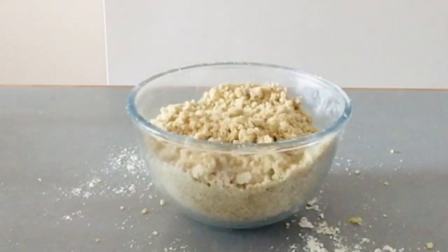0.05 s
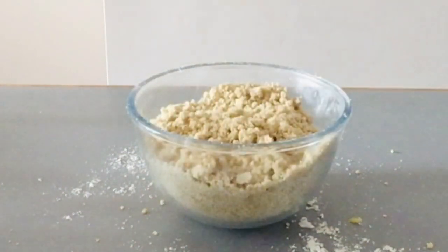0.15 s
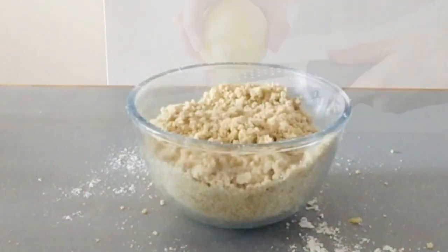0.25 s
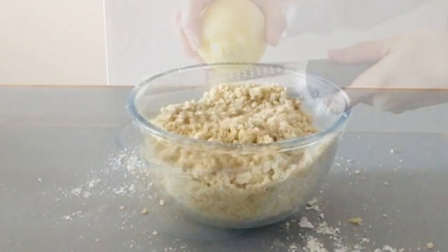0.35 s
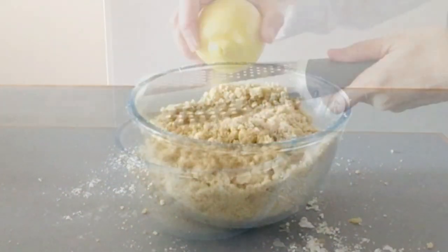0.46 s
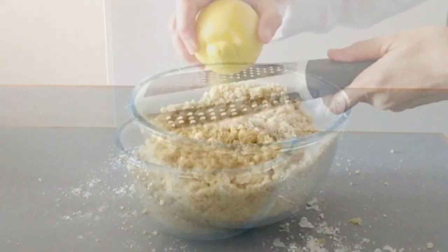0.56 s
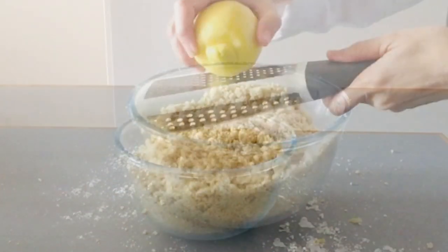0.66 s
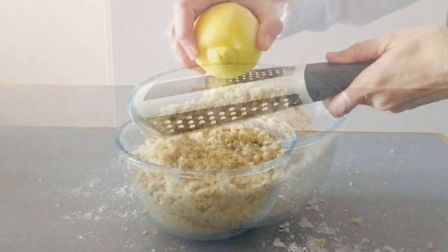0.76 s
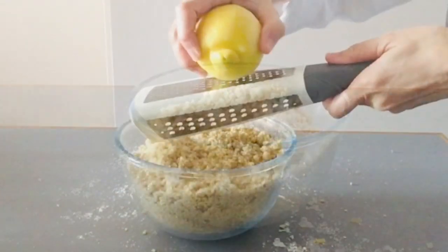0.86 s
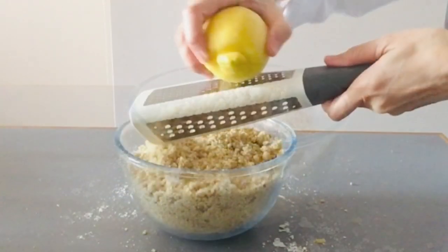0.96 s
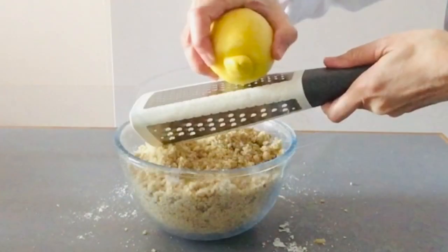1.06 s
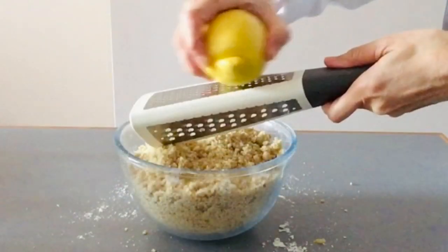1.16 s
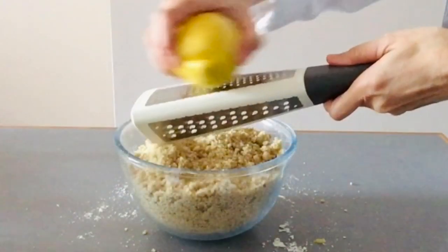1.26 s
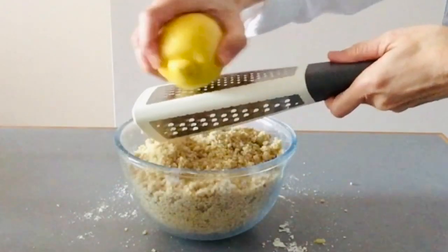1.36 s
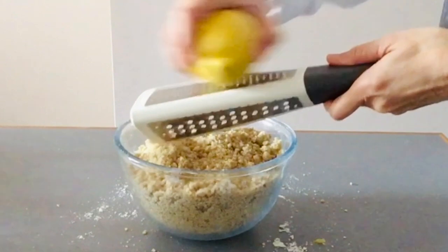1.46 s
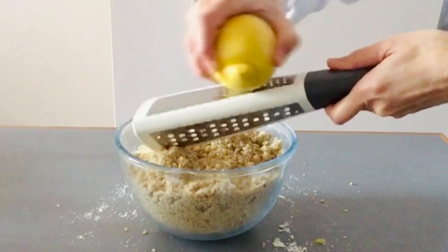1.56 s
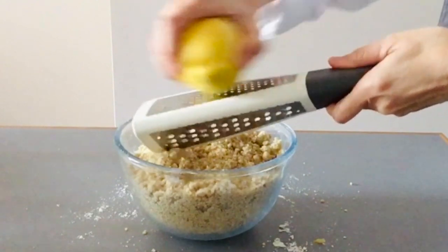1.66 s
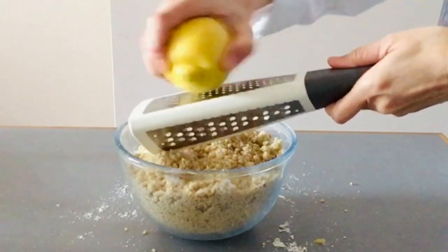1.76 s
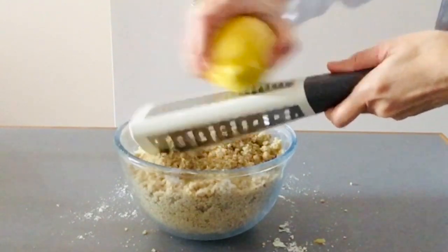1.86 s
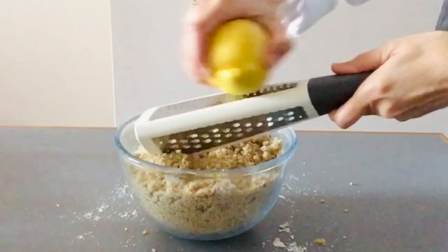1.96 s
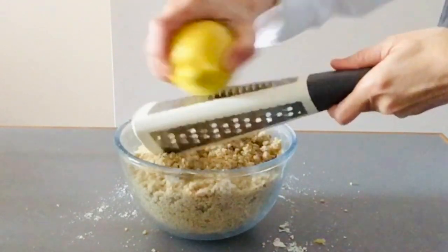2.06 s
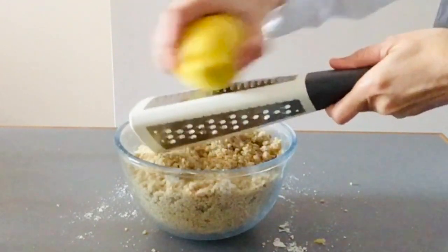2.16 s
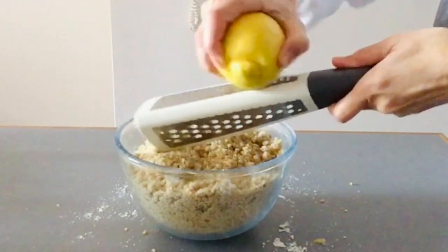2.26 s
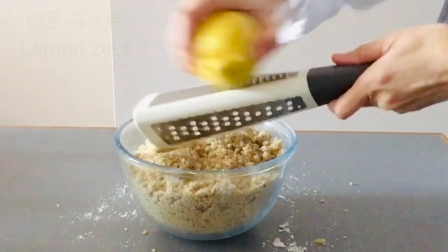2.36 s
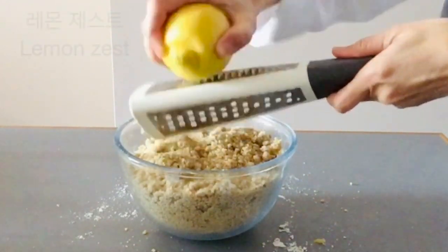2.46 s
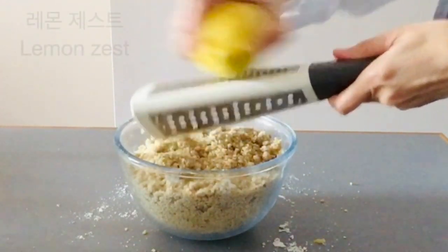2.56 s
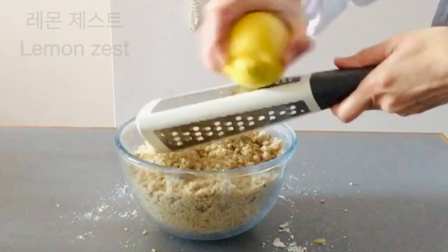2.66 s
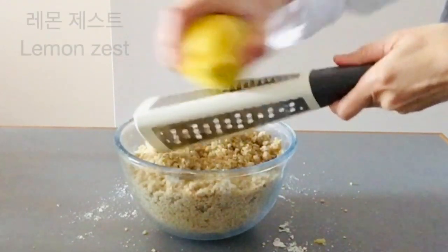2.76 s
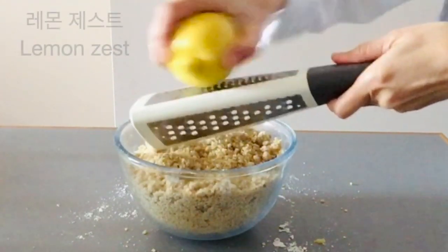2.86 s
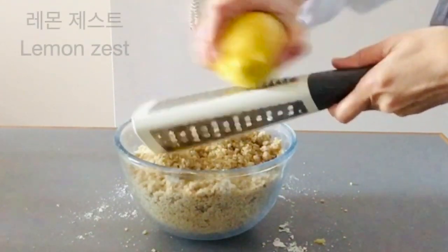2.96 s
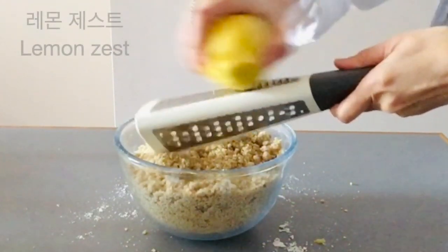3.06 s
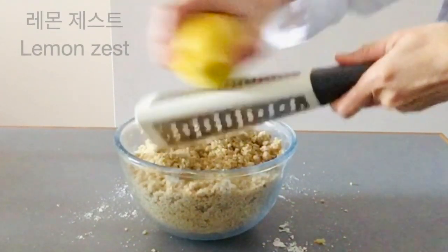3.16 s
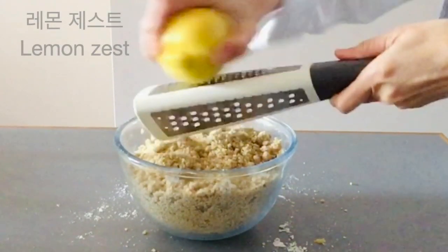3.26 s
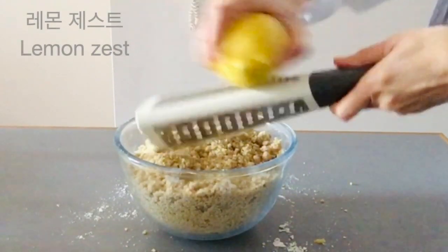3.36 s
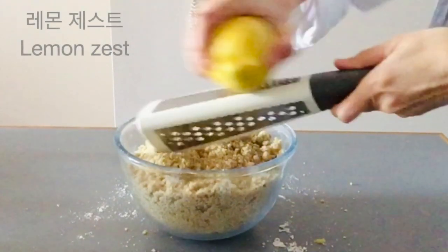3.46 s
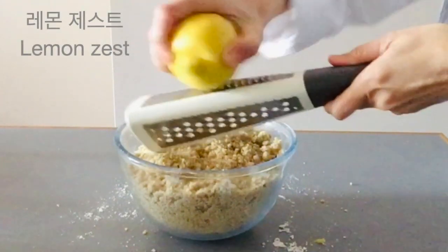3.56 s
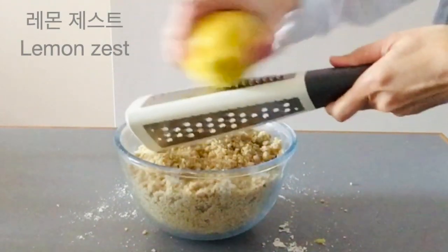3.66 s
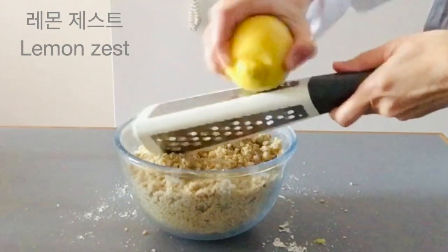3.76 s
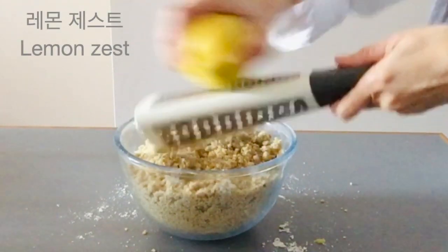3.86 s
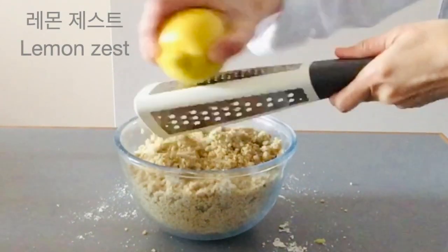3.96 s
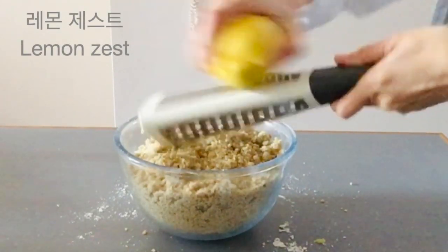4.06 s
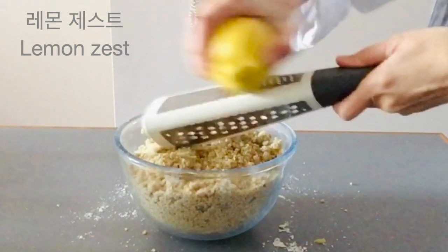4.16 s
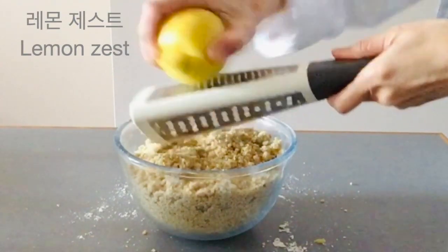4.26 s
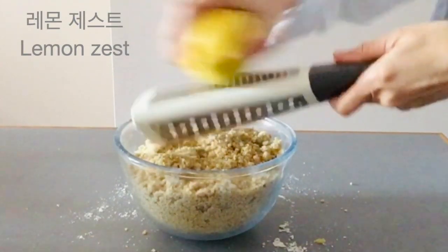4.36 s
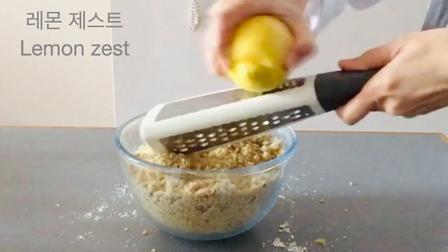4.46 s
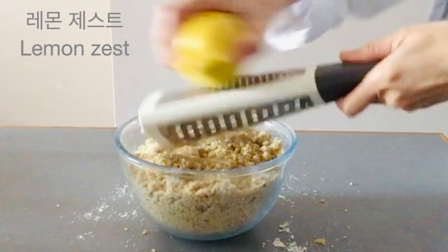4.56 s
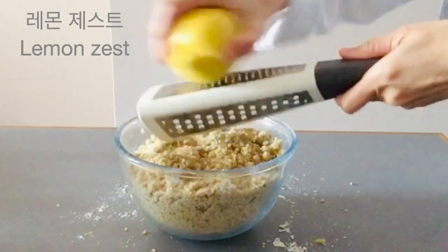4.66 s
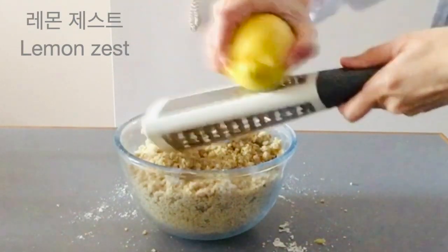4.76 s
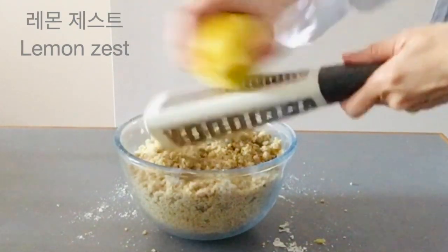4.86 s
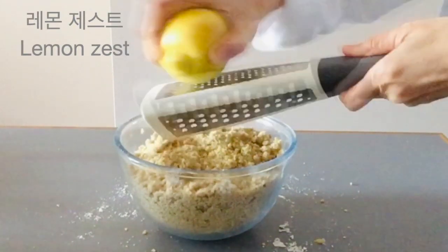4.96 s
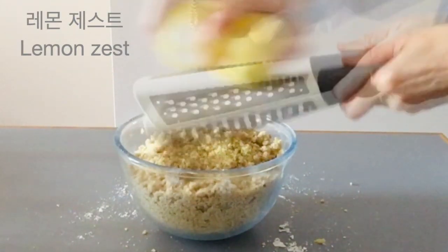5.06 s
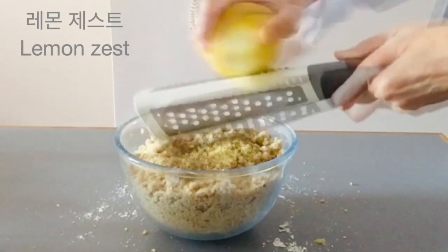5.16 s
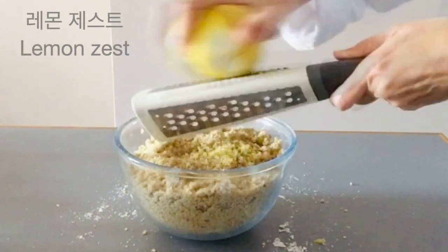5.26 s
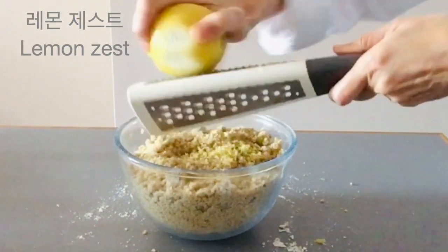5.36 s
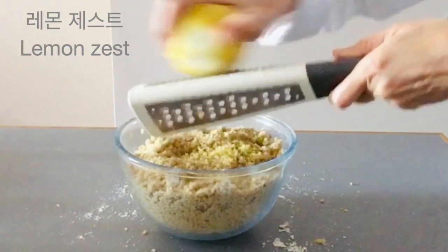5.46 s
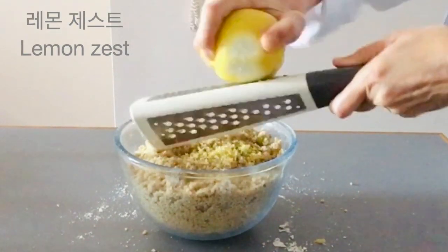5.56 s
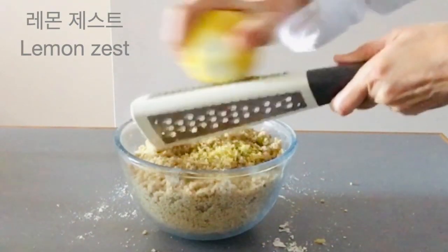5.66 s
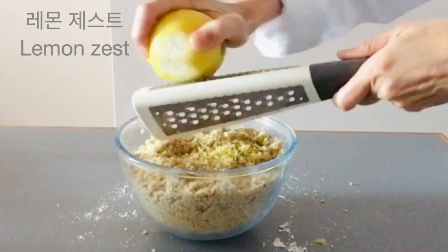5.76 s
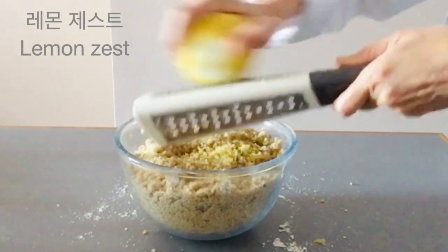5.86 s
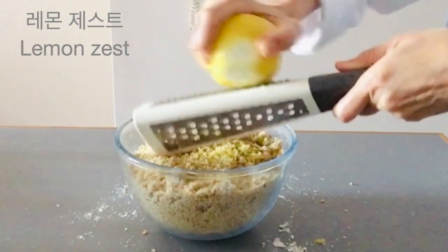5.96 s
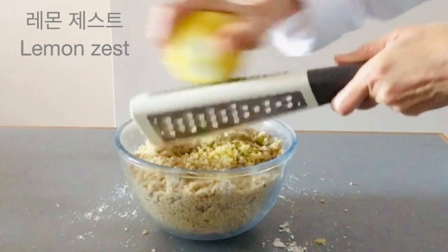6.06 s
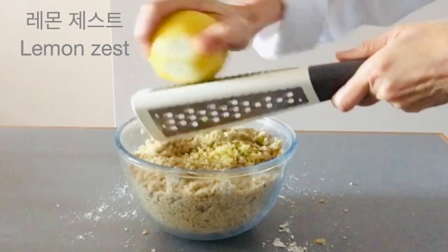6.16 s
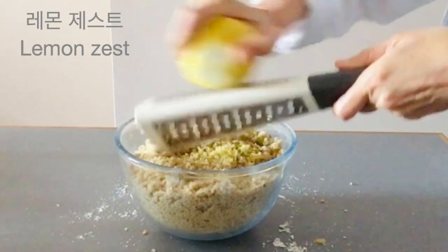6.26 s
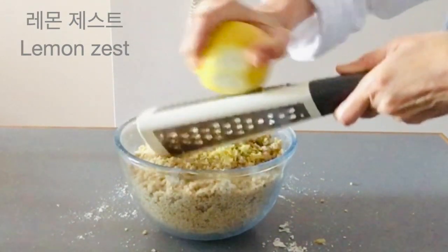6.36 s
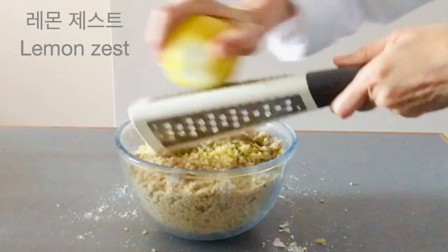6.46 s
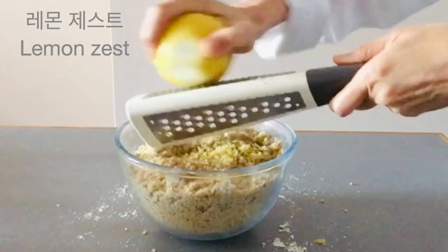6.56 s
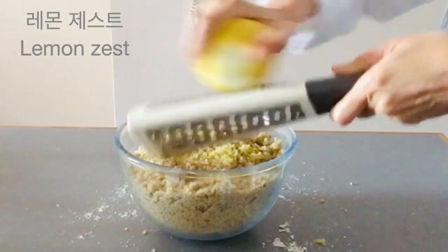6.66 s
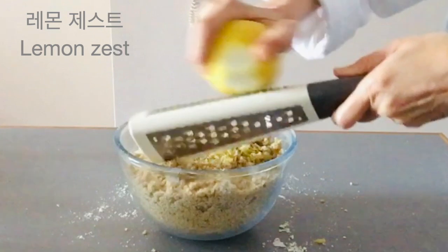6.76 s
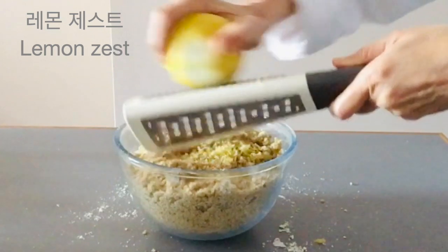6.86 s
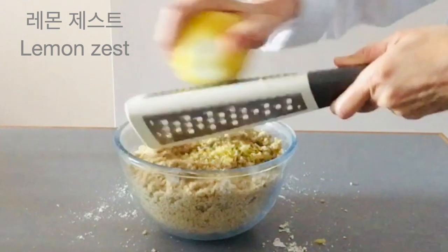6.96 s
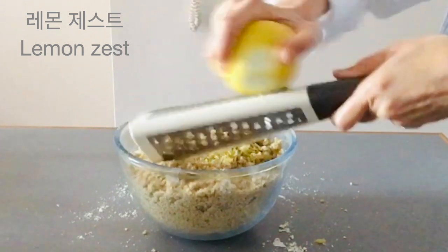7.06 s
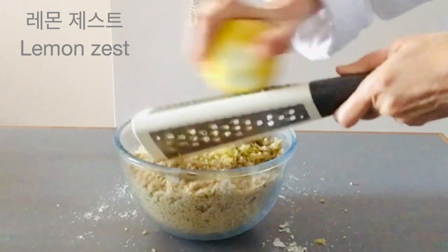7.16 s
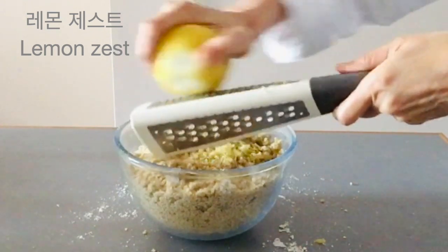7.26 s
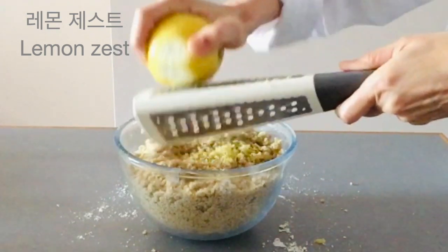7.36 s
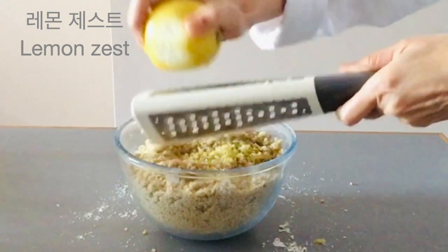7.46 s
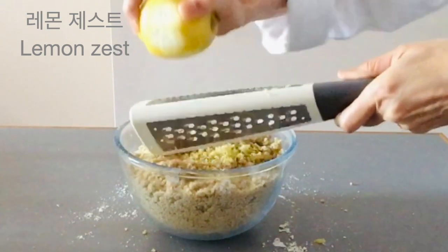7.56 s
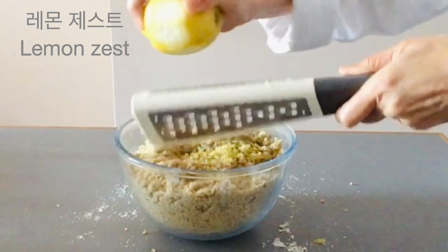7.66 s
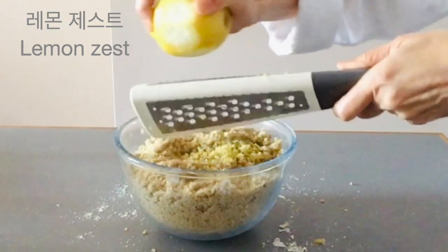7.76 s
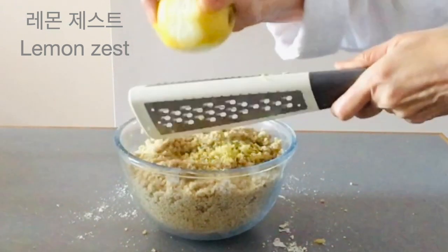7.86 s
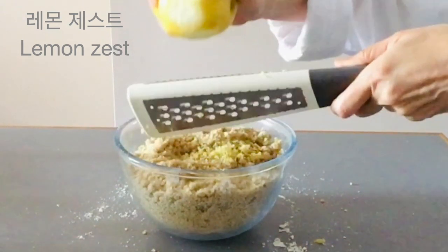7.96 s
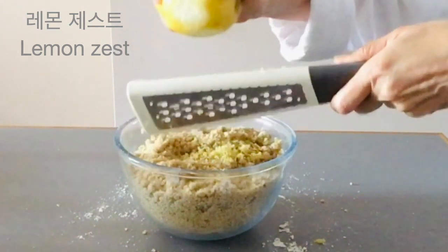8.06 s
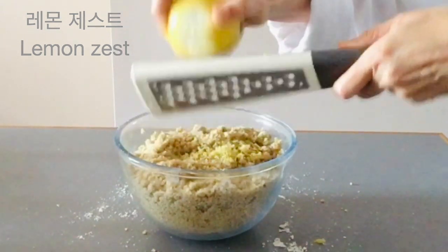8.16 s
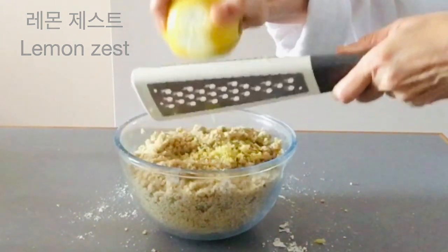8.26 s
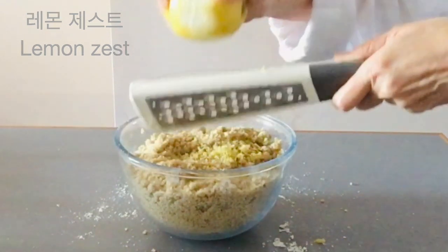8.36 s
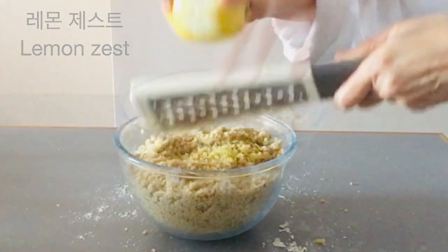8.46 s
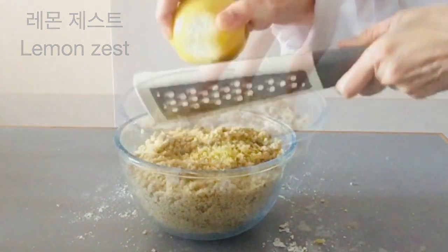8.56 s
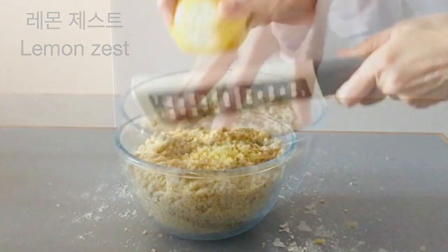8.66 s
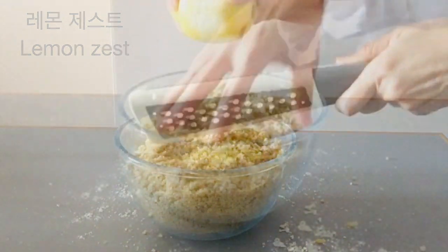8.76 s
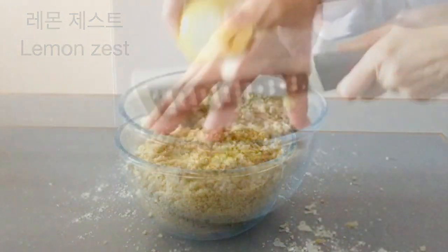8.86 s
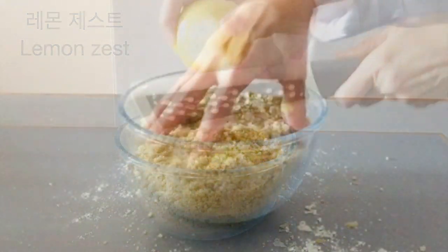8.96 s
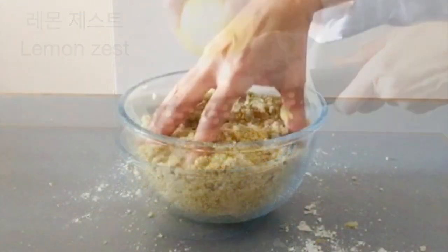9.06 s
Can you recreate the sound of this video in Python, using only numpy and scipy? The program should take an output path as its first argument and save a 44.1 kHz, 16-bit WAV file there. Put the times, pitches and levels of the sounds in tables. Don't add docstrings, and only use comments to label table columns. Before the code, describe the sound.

Faint hiss gives way to a lemon being zested close to the microphone. Dry, grainy strokes swing steadily back and forth, the thin metal blade ringing with a papery, bright rasp and occasional snapping catches. After the last stroke, three spaced dull taps sound on the plastic handle, each softer, in a small room with light echo, hum and rumble.

```python
import sys
import numpy as np
from scipy import signal
from scipy.fft import rfft, irfft, next_fast_len
from scipy.io import wavfile

SR = 44100
rng = np.random.default_rng(int(sys.argv[2]) if len(sys.argv) > 2 else 0)


def generate_wav(signal):
    frames = np.transpose(np.atleast_2d(signal))
    scaled = np.clip(frames, -1, 1) * 32767
    pcm = np.round(scaled).astype(np.int16)
    wavfile.write(sys.argv[1], SR, pcm)


def amplitude_ratio(level_db):
    exponent = np.asarray(level_db, float) / 20
    return 10 ** exponent


N = 402633
TIME = np.arange(N) / SR
SHOT_CHANGE_S = 5.07


def rms_one(x):
    return x / np.sqrt(np.mean(x ** 2) + 1e-20)


def in_time(rows):
    s, *columns = np.transpose(rows)
    return [np.interp(TIME, s, c) for c in columns]


def colour(x, points):
    size = next_fast_len(N + SR)
    hz, db = np.transpose(points)
    bins_hz = np.arange(size // 2 + 1) * SR / size
    gain_db = np.interp(np.log(bins_hz + 1), np.log(hz), db)
    cepstrum = irfft(np.log(amplitude_ratio(gain_db)), size)
    cepstrum[1:size // 2] *= 2
    cepstrum[size // 2 + 1:] = 0
    return irfft(rfft(x, size) * np.exp(rfft(cepstrum)), size)[:N]


def drift(rate):
    r = np.exp(-40 * np.pi * rate / SR)
    slow = signal.lfilter([1], [1, -2 * r, r * r], rng.standard_normal(N // 20 + 502))[500:]
    return np.interp(np.arange(N) / 20, np.arange(len(slow)), rms_one(slow))


def resonance(x, hz, width_hz):
    r = np.exp(-np.pi * width_hz / SR)
    top = (1 - r * r) / 2
    return signal.lfilter([top, 0, -top], [1, -2 * r * np.cos(2 * np.pi * hz / SR), r * r], x)


def ring(clicks, modes, spread_db):
    out, hits = 0, np.flatnonzero(clicks)
    for hz, db, t60 in modes:
        r, w = amplitude_ratio(-60 / (t60 * SR)), 2 * np.pi * hz / SR
        struck = clicks + 1e-18
        struck[hits] *= amplitude_ratio(spread_db * rng.standard_normal(len(hits)))
        out = out + signal.lfilter([0, amplitude_ratio(db) * np.sin(w)], [1, -2 * r * np.cos(w), r * r], struck)
    return out


def clicks_at(seconds, db):
    out = np.zeros(N)
    out[np.round(np.asarray(seconds) * SR).astype(int)] = amplitude_ratio(np.asarray(db))
    return out


def low_pass(x, hz):
    size = next_fast_len(N)
    spectrum = rfft(x, size)
    spectrum[int(hz / SR * size):] = 0
    return irfft(spectrum, size)[:N]


def high_pass(x, hz):
    return signal.sosfilt(signal.butter(2, hz, "high", fs=SR, output="sos"), x)


# (time [s], level [dB])
EARLIER_HISS = [
    (0, -73.5),
    (.3, -73.5),
    (.55, -77),
    (.75, -84),
    (.9, -98),
]


def earlier_scene():
    level = amplitude_ratio(in_time(EARLIER_HISS)[0]) * (TIME < EARLIER_HISS[-1][0])
    return low_pass(level * rng.standard_normal(N), 15750)


# (time [s], level [dB])
SCENE_FADE = [
    (0, -20),
    (.5, -13),
    (1, -0.4),
    (3, 0.5),
    (4.5, 4),
    (6, 0.5),
    (8.2, -1),
    (8.7, -3),
    (9.13, -14.5),
]
# (frequency [Hz], level [dB per Hz])
HISS_COLOUR = [(200, 0.5), (400, -2), (660, 1), (1000, -2), (3000, -2.5), (6400, -4.5), (9000, -6.5),
               (12500, -9)]
# (frequency [Hz], level [dB per Hz])
RUMBLE_COLOUR = [(12, -17), (22, -10), (38, -7), (50, 5.5), (60, 0), (74, -1.5), (95, -4.5), (170, -4),
                 (300, -12), (500, -26)]
HUM_HZ = (13.7, 32.5)
# (time [s], level [dB])
COUNTER_SHAKE = [(.7, -81), (.96, -60), (1.25, -63), (1.45, -57), (2, -46), (2.34, -43), (2.6, -53),
                 (3.66, -48.5), (3.84, -44), (5.421, -46.5), (5.6, -51.5), (6.66, -48.5), (6.809, -42),
                 (6.94, -63.5), (7.14, -38), (7.53, -53), (8.95, -60.5), (9.13, -61)]
HISS_DB, RUMBLE_DB, UPPER_HUM_DB = -59.5, -64.5, -62
RUMBLE_FOLLOWS = 0.7


def background():
    fade_db, = in_time(SCENE_FADE)
    hiss = amplitude_ratio(HISS_DB + fade_db) * rms_one(colour(rng.standard_normal(N), HISS_COLOUR))
    rumble_db = RUMBLE_DB + RUMBLE_FOLLOWS * np.minimum(fade_db, 0) + 0.97 * drift(1.7)
    rumble = amplitude_ratio(rumble_db) * rms_one(colour(rng.standard_normal(N), RUMBLE_COLOUR))
    hum = 0
    for hz, db in zip(HUM_HZ, (in_time(COUNTER_SHAKE)[0], UPPER_HUM_DB + fade_db)):
        pitch_hz = hz * (1 + 0.0692 * drift(4.08))
        level = amplitude_ratio(db + 1.7 + 3.75 * drift(4.8))
        hum = hum + level * np.sin(2 * np.pi * np.cumsum(pitch_hz) / SR)
    return hiss + rumble + hum


# (touch [s], rise [s], touch to lift [s], first bite [dB], swell while cutting [dB])
CUTTING_STROKES = [(1.101, 0.1, 0.18, -59, 5), (1.566, 0.039, 0.11, -52.5, 5),
                   (1.942, 0.022, 0.11, -49.5, 8.5), (2.312, 0.043, 0.11, -43.5, 5),
                   (2.696, 0.031, 0.11, -37, -2.5), (3.059, .018, 0.1, -37, 0.4),
                   (3.405, 0.068, 0.12, -36.5, -1.5), (3.774, 0.024, 0.11, -37, 1.5),
                   (4.135, 0.042, 0.11, -37.5, 1), (4.477, 0.027, 0.091, -32.5, 0.5),
                   (4.816, .045, 0.096, -31, -2.5), (5.212, .102, 0.15, -35.5, -2.1),
                   (5.62, 0.025, 0.11, -40.5, 6), (5.986, 0.065, 0.13, -36, -1),
                   (6.379, .031, 0.11, -40, 3.2), (6.74, .03, 0.1, -44, 13),
                   (7.116, 0.039, 0.14, -34.5, 2.5)]
# (full contact [s], hold [s], level [dB])
RETURN_STROKES = [(1.433, 0.051, -58), (1.8, 0.06, -56.5), (2.19, 0.044, -53), (2.567, 0.033, -49),
                  (2.926, 0.038, -49), (3.275, 0.049, -47), (3.662, 0.03, -47.6), (4.004, 0.042, -45.5),
                  (4.36, 0.025, -42.5), (4.715, 0.015, -42), (5.03, 0.043, -44.5), (5.14, .083, -45.5),
                  (5.485, 0.059, -42), (5.86, 0.051, -43), (6.246, 0.059, -48), (6.63, 0.051, -43),
                  (6.989, 0.065, -43.5), (7.36, 0.04, -53.5)]
CUT_FALL_S = 0.0745
RETURN_RISE_S, RETURN_FALL_S = 0.076, 0.085
PITH_FALL_S = 0.066
GRAB_SHARE, GRAB_DB = 0.48, -8


def pressure():
    strokes = []
    for touch, rise, length, db, swell_db in CUTTING_STROKES:
        strokes.append((touch, rise, length - rise, CUT_FALL_S, db, db + swell_db))
    for s, hold, db in RETURN_STROKES:
        fall = RETURN_FALL_S if s < SHOT_CHANGE_S else PITH_FALL_S
        strokes.append((s - RETURN_RISE_S, RETURN_RISE_S, hold, fall, db, db))
    power = np.zeros(N)
    for touch, rise, hold, fall, first_db, last_db in strokes:
        steps = [0, GRAB_SHARE * rise, (1 - GRAB_SHARE) * rise, hold, fall, 2 * fall]
        corners = touch + np.cumsum(steps)
        db = [first_db - 20, first_db + GRAB_DB, first_db, last_db, last_db - 20, last_db - 60]
        a, b = int(corners[0] * SR), int(corners[-1] * SR)
        power[a:b] += amplitude_ratio(2 * np.interp(TIME[a:b], corners, db))
    return np.sqrt(power)


def tearing(force):
    sizes = amplitude_ratio(3.1 * np.minimum(rng.exponential(1, N), 3.5)) * rng.choice([-1, 1], N)
    grains_per_s = 4000 * amplitude_ratio(2.2 * drift(50))
    grains = rms_one(sizes * (rng.random(N) < grains_per_s / SR))
    bite = np.clip(force / amplitude_ratio(-35.0), 0, 1) ** 0.25
    friction = rng.standard_normal(N) * (1 - 0.3 * bite)
    return amplitude_ratio(0.87 * drift(91)) * (friction + 0.58 * bite * grains)


# (frequency [Hz], width [Hz], level [dB])
GRATER_MODES = [(85.5, 35, -9.5), (160, 38, -8.5), (262.5, 44.3, -1.5), (334, 68, -6.5), (428, 160, -9.5),
                (1007, 26.7, -1), (1097, 30, -2.5), (1508, 120, 0), (1578, 69, 4.5), (1710, 177, 1.5),
                (2160, 95, -4), (2324, 120, -5), (2950, 170, -4), (3037, 106, -2.5), (3505, 117, -6),
                (3945, 110, -7.5), (4840, 155, -7.5), (5690, 145, -4.5), (6150, 300, -8.5),
                (8130, 890, -14), (9400, 140, -18)]
# (frequency [Hz], level [dB per Hz])
PEEL_COLOUR = [(40, -39), (120, -33.5), (400, -17), (900, -11.5), (1300, -6.5), (2600, -6.5), (4400, -5.5),
               (5300, -9), (6300, -10), (7000, -17), (8800, -16), (12500, -24.5)]
# (time [s], place [-1 tip to 1 handle])
FRUIT_PLACE = [
    (1, -1.9),
    (1.8, -.6),
    (2.6, -0.065),
    (4, -0.55),
    (4.6, -0.63),
    (4.95, -0.69),
    (5.25, 0.071),
    (5.9, 0.65),
    (7, 0.048),
    (7.6, 0.84),
]
# (level at mid blade [dB], gain toward the handle [dB])
HANDLE_DB, PEEL_DB, NECK_DB, LOW_BLADE_DB = (-1.9, -3), (2.07, 0.9), (-1.5, 7), (0.7, -3.5)
UPPER_BLADE_DB = 1


def grater(force):
    grains = tearing(force)
    place, = in_time(FRUIT_PLACE)
    settings = (HANDLE_DB, PEEL_DB, NECK_DB, LOW_BLADE_DB)
    handle_db, hiss_db, neck_db, blade_db = (db + slope * place for db, slope in settings)
    out = amplitude_ratio(7.5 + hiss_db) * colour(force * grains * rng.choice([-1, 1], N), PEEL_COLOUR)
    wander = [drift(21) + 0.65 * drift(5.7) for k in range(9)]
    shake = amplitude_ratio(-7.5) * force ** 0.77
    for k, (hz, width_hz, mode_db) in enumerate(GRATER_MODES):
        if hz < 350:
            place_db = handle_db
        elif hz < 600:
            place_db = neck_db
        else:
            place_db = blade_db * (hz < 1200) + UPPER_BLADE_DB * place * (2000 < hz < 2600)
        drive = shake if hz < 600 else force
        fed = drive * grains * amplitude_ratio(2.7 * wander[k % 9] + place_db)
        out += (-1) ** k * amplitude_ratio(mode_db + 11.0) * resonance(fed, hz, width_hz)
    return out


KITCHEN_T60_S, KITCHEN_DB, WALL_CUT_HZ = 0.8, -12.5, 5700


def kitchen(x):
    t = np.arange(int(.7 * SR)) / SR
    size, out = next_fast_len(N + SR), 0
    place = (TIME * 5.3) % 4
    for k in range(4):
        white = rng.standard_normal(len(t)) * (t > .006)
        dull = signal.sosfilt(signal.butter(1, WALL_CUT_HZ, fs=SR, output="sos"), white)
        tail = dull * amplitude_ratio(-60 * t / KITCHEN_T60_S) + (white - dull) * amplitude_ratio(-100 * t / KITCHEN_T60_S)
        share = np.clip(1 - np.abs((place - k + 2) % 4 - 2), 0, 1)
        out = out + rfft(x * share, size) * rfft(tail / np.sqrt(np.sum(tail ** 2)), size)
    return irfft(out, size)[:N]


# (time [s], peak level [dB], brightness [dB])
CATCHES = [(1.9708, -39, -6), (2.4159, -30, -5), (2.7555, -31, -6), (3.0798, -23, 4), (3.1654, -28, -3),
           (3.441, -34, 1), (3.4611, -29, -7), (3.4879, -26, 7), (3.7913, -31, -1), (3.83, -26, 0),
           (4.1722, -27, -11), (4.2399, -27, -8), (4.4892, -25, 1), (4.5344, -16.5, 8), (4.542, -21, 10),
           (4.5648, -24, -1), (4.5908, -24, -6), (4.8613, -23, 6), (4.8843, -24, -3), (5.1832, -32, -4),
           (5.2155, -29, 8), (5.2623, -32, 6), (5.7, -24, -4), (5.8848, -31, 9), (6.0524, -28, 7),
           (6.7885, -26, 1), (6.8316, -15, 9), (7.1579, -22, 3), (7.1959, -21, 8), (7.2524, -24, -3)]
# (frequency [Hz], level [dB], time to die by 60 dB [s])
TOOTH_MODES = [(3000, -3.5, .01), (4100, -6, .007), (5700, -7, .006), (8300, -13, .003)]
# (frequency [Hz], level [dB], time to die by 60 dB [s])
SNAGGED_BLADE_MODES = [(1050, -11, .02), (1560, -3, .014), (1800, -6, .012)]
NICKS_PER_S, NICK_FORCE_DB, NICK_OVER_DB, NICK_SPREAD_DB = 60, -36, 3, 3


def snags(force):
    nicks_per_s = NICKS_PER_S * np.minimum(force / amplitude_ratio(NICK_FORCE_DB), 1)
    nicks = np.flatnonzero(rng.random(N) < nicks_per_s / SR)
    luck = rng.standard_normal((len(nicks), 2))
    force_db = 20 * np.log10(np.minimum(force[nicks], amplitude_ratio(NICK_FORCE_DB - 0.5)))
    nick_db = force_db + NICK_OVER_DB + NICK_SPREAD_DB * luck[:, 0]
    lesser = np.transpose([nicks / SR, nick_db, 5 * luck[:, 1]])
    s, db, bright_db = np.vstack([CATCHES, lesser]).T
    crack = ring(clicks_at(s, db + .7 * np.minimum(bright_db, 0)), TOOTH_MODES, spread_db=1.6)
    jolt_clicks = clicks_at(s + .0004, db - 5.5 - np.maximum(bright_db, 0))
    jolt = ring(jolt_clicks, SNAGGED_BLADE_MODES, spread_db=2)
    return amplitude_ratio(1) * high_pass(crack - jolt, 850)


# (time [s], peak level [dB], tick level [dB], rattle [Hz], rattle delay [s])
KNOCKS = [
    (8.1582, -33, -43.5, 3500, 0.0037),
    (8.5153, -36, -45.5, 2700, 0.00087),
    (8.852, -38.5, -50.5, 2550, 0.0011),
]
# (frequency [Hz], level [dB], time to die by 60 dB [s])
HANDLE_MODES = [(82.6, -6, 0.13), (136, 2.5, 0.04), (181, -7, 0.051), (291, -2.5, 0.026), (434, -7, 0.017)]
# (frequency [Hz], level [dB], time to die by 60 dB [s])
KNOCKED_BLADE_MODES = [(1060, -6, .02), (1570, 3, 0.0098)]


def knocks():
    s, db, tick_db, rattle_hz, late_s = np.transpose(KNOCKS)
    handle = ring(clicks_at(s, db - 0.5), HANDLE_MODES, spread_db=0.5)
    softened = signal.lfilter([.07], [1, -.93], handle)
    out = high_pass(softened, 110)
    out += ring(clicks_at(s + 0.00136, tick_db), KNOCKED_BLADE_MODES, spread_db=1.5)
    for at, level_db, hz in zip(s + late_s, tick_db, rattle_hz):
        out += ring(clicks_at([at], [level_db - 2.5]), [(hz, 0, .012)], spread_db=5)
    return out


SHOT_TOPS_HZ = (12100, 12550)


def scene():
    force = pressure()
    blows = knocks()
    tool = grater(force) + snags(force) + blows
    echo = amplitude_ratio(KITCHEN_DB) * kitchen(tool + 0.48 * blows)
    shot = tool + echo + background()
    later = np.clip((TIME - SHOT_CHANGE_S) / .05, 0, 1)
    shot = (1 - later) * low_pass(shot, SHOT_TOPS_HZ[0]) + later * low_pass(shot, SHOT_TOPS_HZ[1])
    return (shot + earlier_scene())[None]


def top_cut(x):
    return signal.sosfilt(signal.butter(12, 15750, fs=SR, output="sos"), x)


def record(dry):
    mix = dry + amplitude_ratio(-102) * rng.standard_normal(dry.shape)
    return top_cut(mix)


dry = scene()
out = record(dry)
generate_wav(out)
```